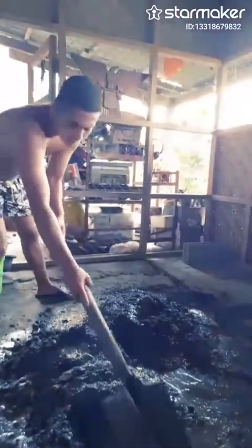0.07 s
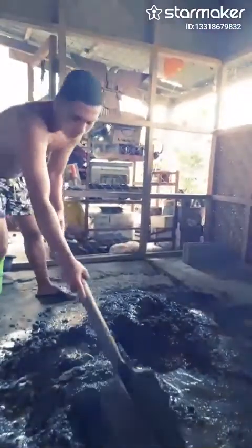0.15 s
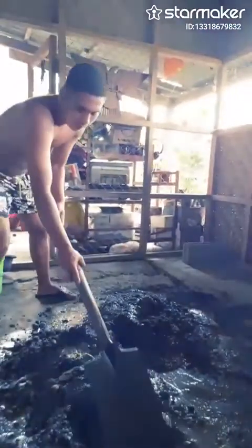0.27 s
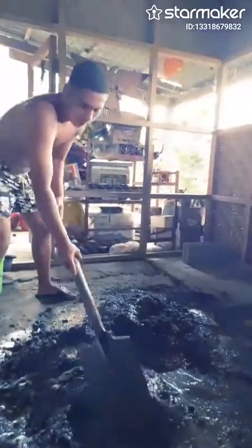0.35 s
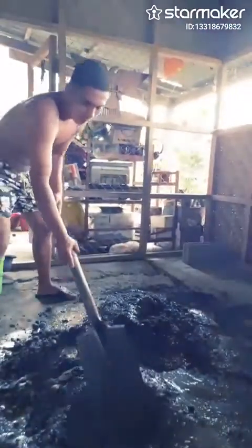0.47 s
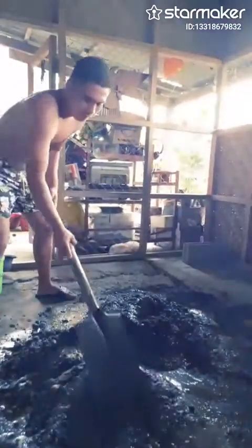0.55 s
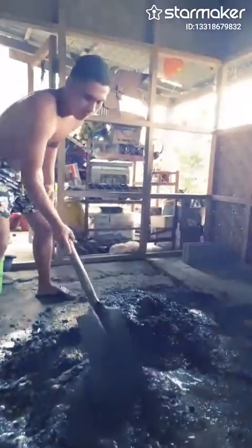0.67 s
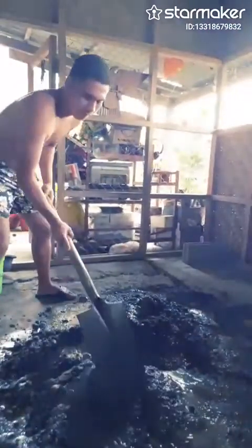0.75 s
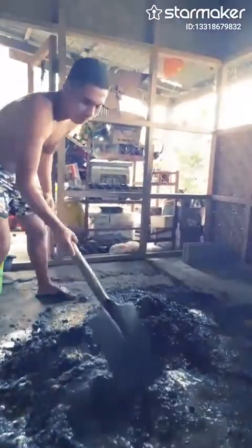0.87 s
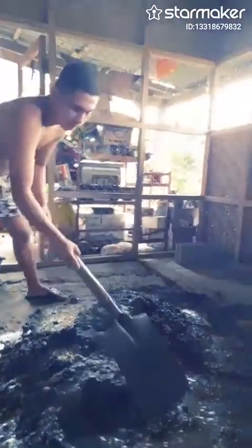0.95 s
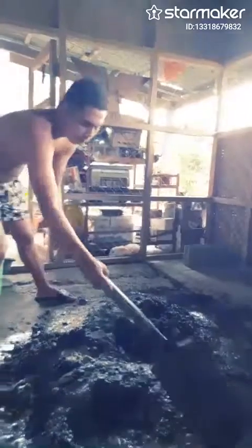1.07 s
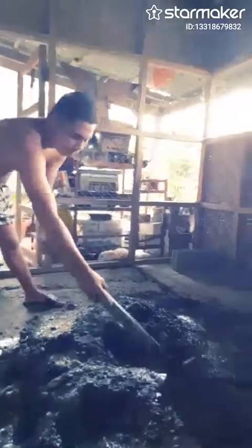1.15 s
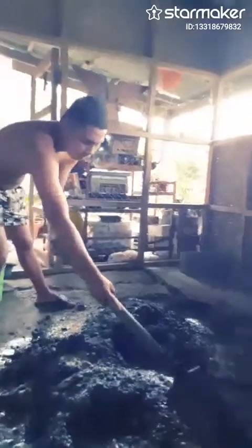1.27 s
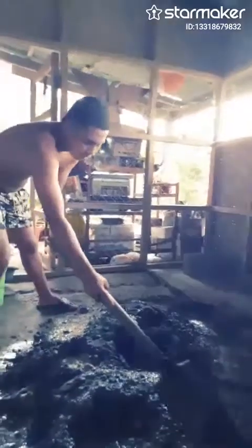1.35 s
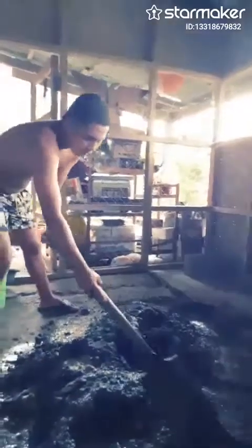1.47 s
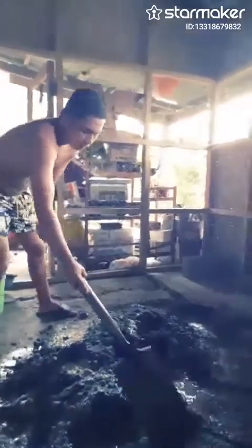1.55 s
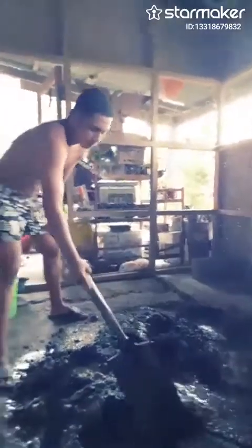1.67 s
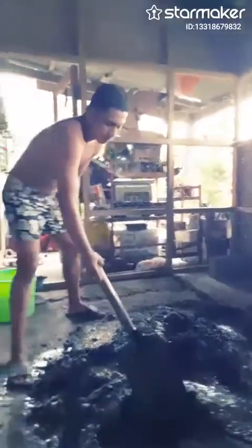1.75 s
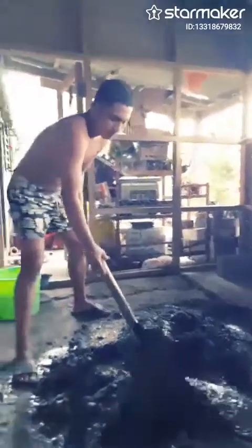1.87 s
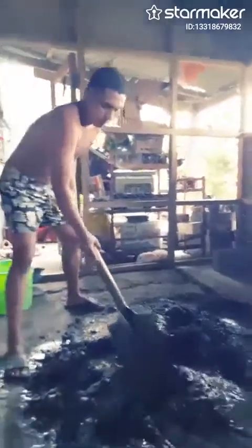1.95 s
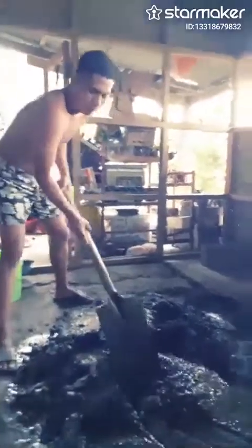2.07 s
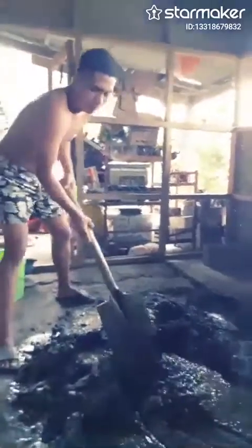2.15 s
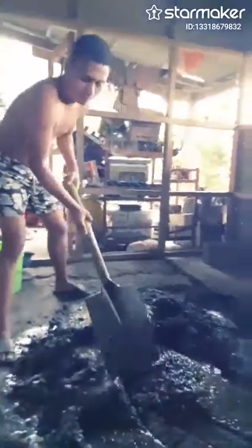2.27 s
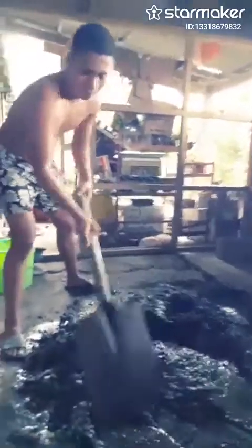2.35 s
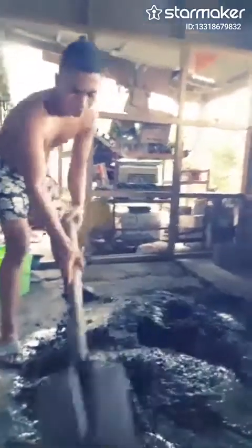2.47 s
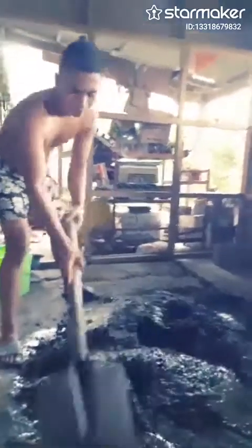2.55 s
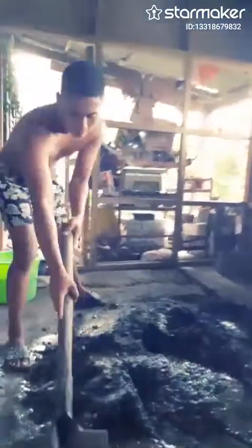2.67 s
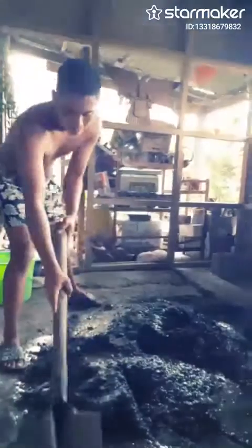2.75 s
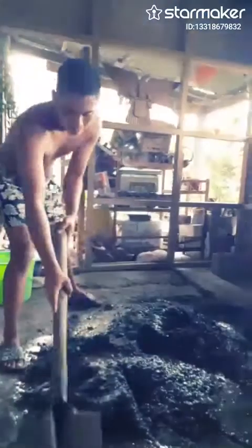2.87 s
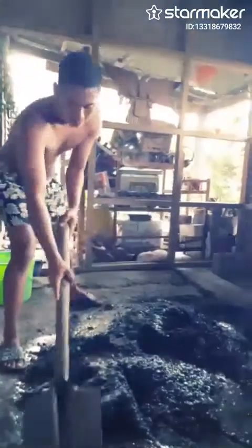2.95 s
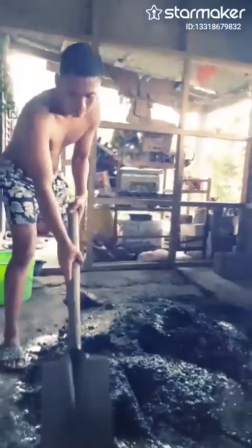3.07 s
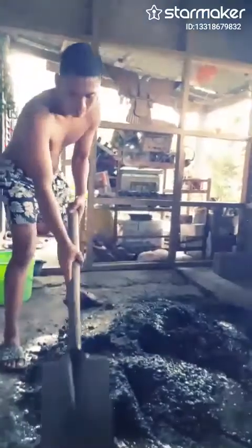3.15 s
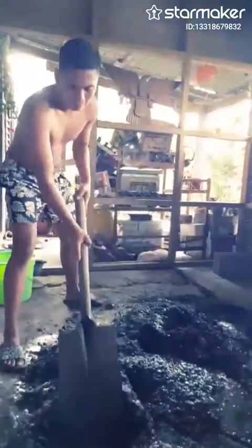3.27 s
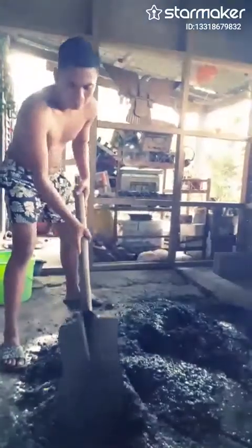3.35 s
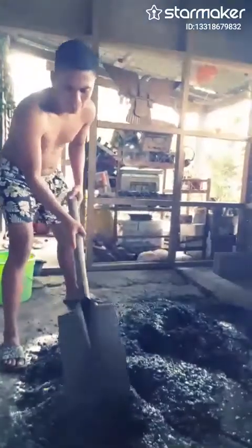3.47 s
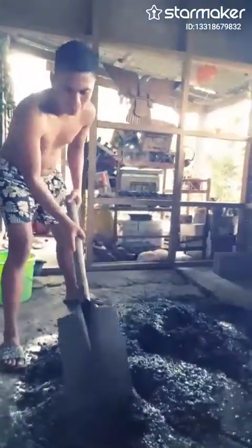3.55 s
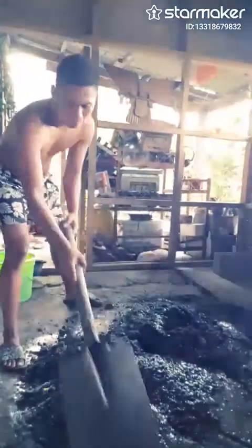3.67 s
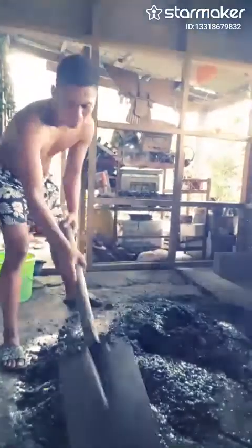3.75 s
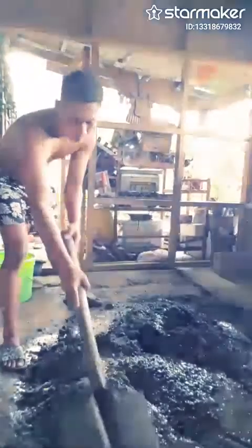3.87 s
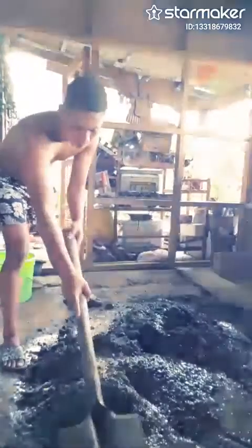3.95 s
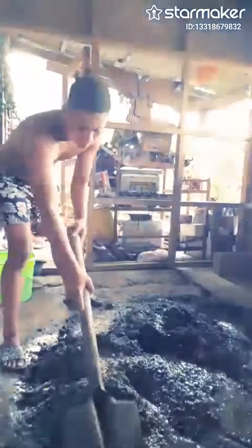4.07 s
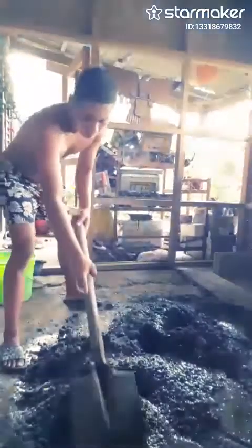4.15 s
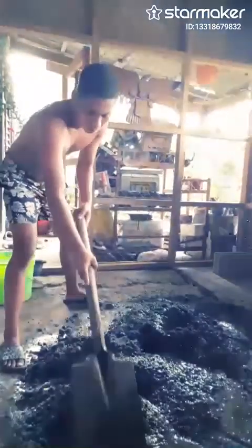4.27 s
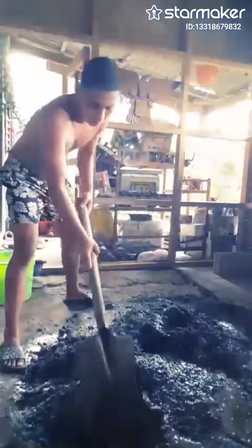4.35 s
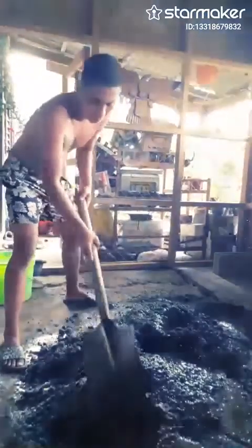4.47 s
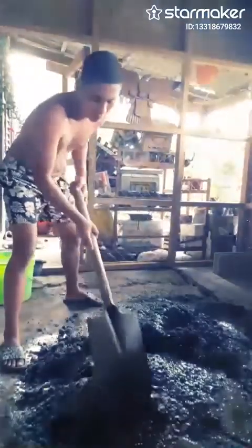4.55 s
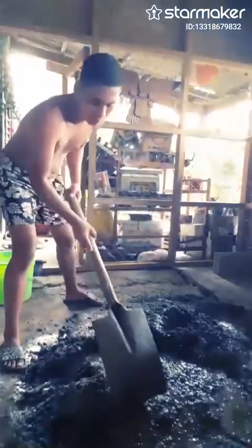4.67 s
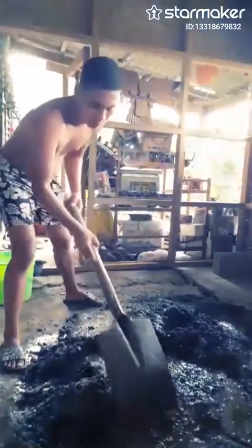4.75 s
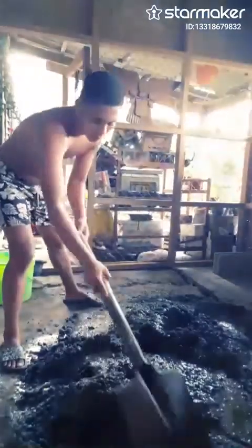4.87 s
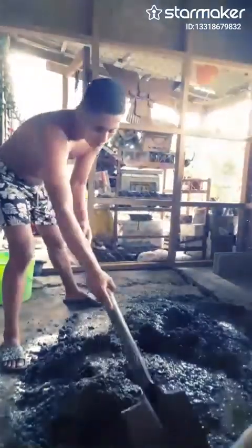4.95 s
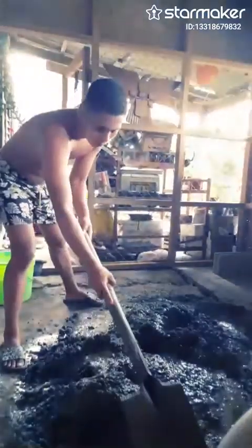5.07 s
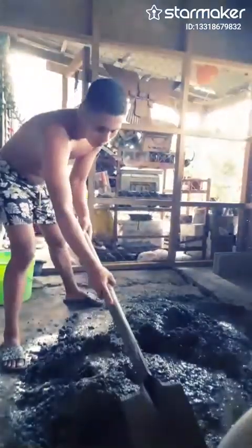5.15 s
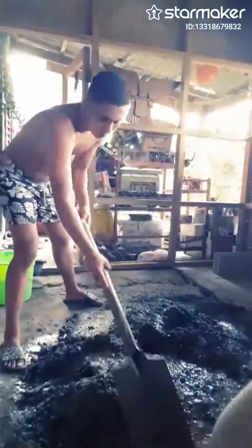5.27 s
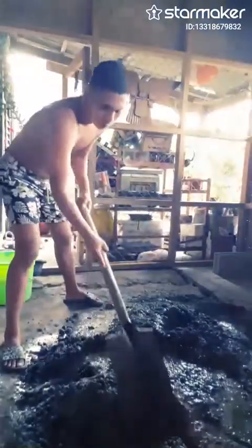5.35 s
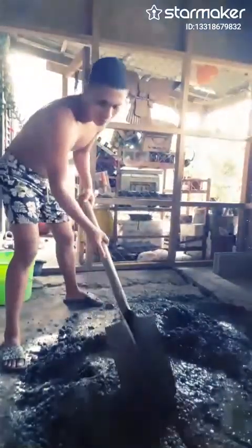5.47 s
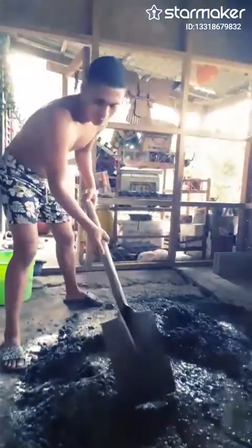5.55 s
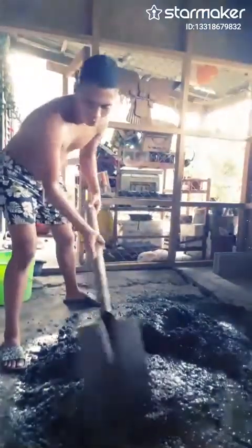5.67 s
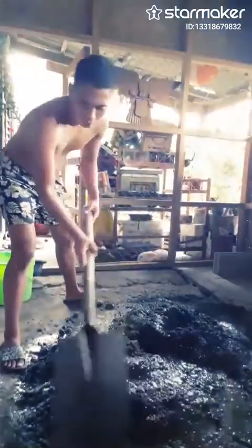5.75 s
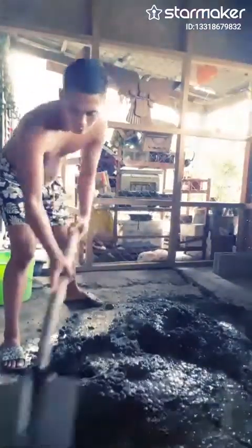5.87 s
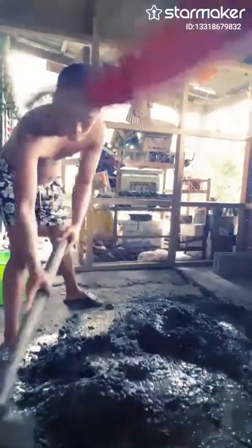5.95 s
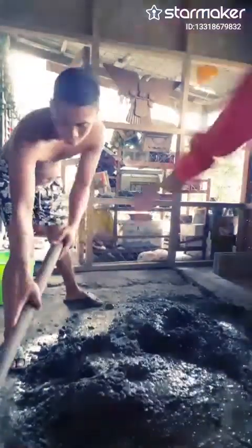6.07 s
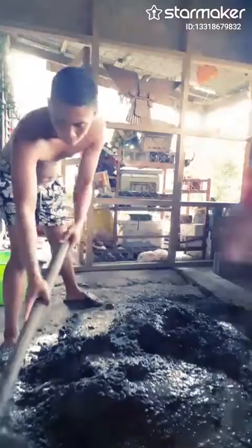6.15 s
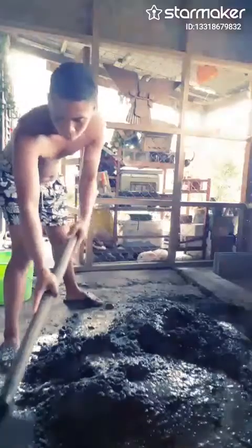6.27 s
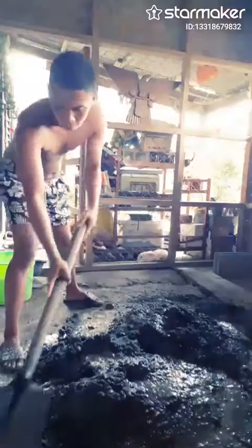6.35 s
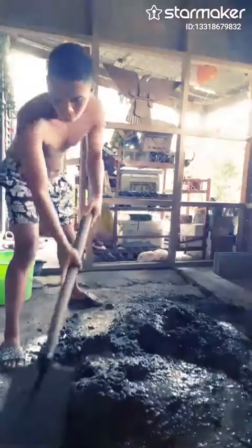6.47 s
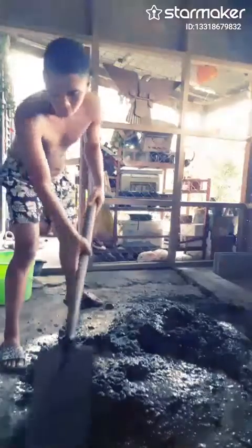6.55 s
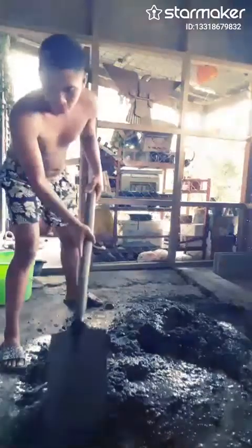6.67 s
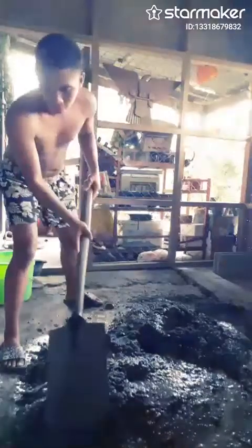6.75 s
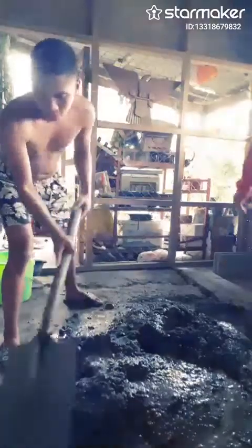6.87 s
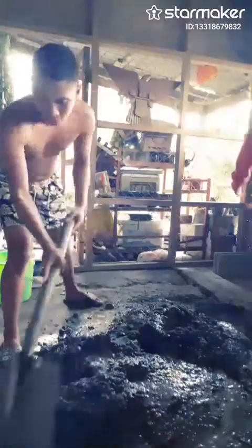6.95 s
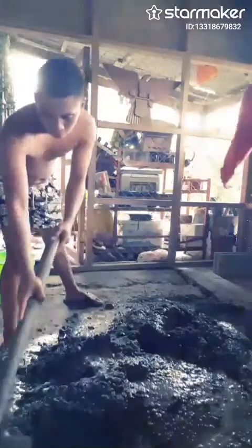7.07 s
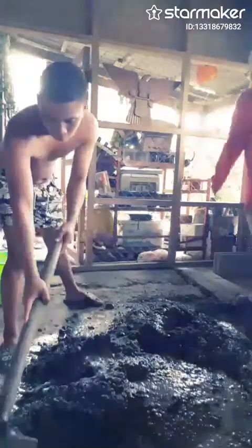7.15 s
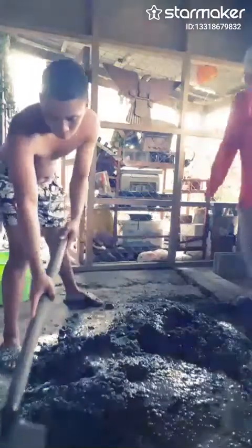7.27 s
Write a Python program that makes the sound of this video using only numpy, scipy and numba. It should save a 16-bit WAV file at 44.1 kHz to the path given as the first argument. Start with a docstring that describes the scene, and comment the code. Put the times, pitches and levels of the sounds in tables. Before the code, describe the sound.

A steel shovel scrapes and crunches through wet gritty mortar on a concrete floor, bright and hissy, over a faint low motor drone.

```python
"""In an open shed, a steel shovel turns wet mortar on the concrete floor.
Stick-slip friction of the edge over sand excites hiss, rasp and rumble; the steel blade resonates with them.
Blows ring the low modes of floor and heap, and knocks on bare steel ring the higher modes of the blade.
Behind, sine partials give a motor drone with mains hum, over soft outdoor noise; thin far chirps glide in pitch.
Decaying noise tails stand for the reflections of the shed, and a limiter holds the peaks."""
import sys
import numpy as np
from scipy import signal
from scipy.fft import rfft, irfft
from scipy.io import wavfile
from scipy.ndimage import uniform_filter1d, minimum_filter1d
from numba import njit

SR = 44100
rng = np.random.default_rng(int(sys.argv[2]) if len(sys.argv) > 2 else 0)


def materialize(psi):
    """Save the field psi as 16-bit PCM at rate SR to the path in sys.argv[1].

    A 1-D psi becomes a single channel; in a 2-D psi each row is a channel.
    """
    bounded = np.clip(np.atleast_2d(psi).T, -1, 1)
    quanta = np.round(bounded * 32767).astype(np.int16)
    wavfile.write(sys.argv[1], SR, quanta)


N = 321930
TIME = np.arange(N) / SR  # s

# common level of motor drone and mains hum over time: (time [s], level [dB])
DRONE_LEVEL = [(.7, -44.5), (1.05, -47), (1.6, -47), (2.4, -43), (7.3, -45)]
# partials of the motor drone, with mains hum at 120 Hz: (frequency [Hz], level relative to the drone [dB])
DRONE_PARTIALS = [(52.3, -25), (78.2, -.5), (103.5, -9.5), (120, -7.5)]
# spectrum of the outdoor noise: (frequency [Hz], relative spectral density [dB])
OUTDOOR_SPECTRUM = [(20, -13), (45, 5), (65, 6), (105, 3), (150, -3.5), (220, -9.5), (450, -23.5),
                    (900, -20), (1500, -24.5), (2500, -20.5), (5000, -18.5), (7500, -14.5), (9600, -4),
                    (12000, -21.5), (15800, -27)]
# far chirps: (start [s], length [s], first frequency [Hz], last frequency [Hz], level [dB])
CHIRPS = [(0.538, .3, 2250, 2035, -49), (0.555, 0.285, 2700, 2639, -55), (3.758, 0.067, 680, 885, -57),
          (3.82, 0.061, 960, 907, -50.5), (5.56, 0.193, 4520, 4640, -51), (5.678, 0.13, 5420, 5050, -48)]
# blade or lump of mortar thuds on the floor:
# (time [s], direct peak level [dB], pitch [Hz], 60 dB decay of the crumbling force [s])
THUDS = [(1.18, -36.5, 340, 0.04), (2.276, -37, 219, .05), (2.543, -36, 135, 0.048),
         (2.625, -19.5, 175, .11), (2.698, -35, 164, 0.11), (3.041, -36.5, 200, 0.52),
         (3.425, -42, 370, 0.23), (3.876, -28, 158, 0.14), (4.206, -30.5, 161, .064),
         (4.952, -35, 167, .087), (5.63, -40.5, 282, 0.2), (6.026, -31, 170, 0.068),
         (6.049, -22.5, 180, 0.17), (6.11, -34, 180, 0.13), (7.063, -25, 170, .12), (7.255, -19, 260, 0.1)]
# modes of floor and heap: (frequency [Hz], relative level [dB], 60 dB decay [s])
FLOOR_MODES = [(135.3, 2, 0.23), (161.3, -0.5, 0.088), (191.5, -10, 0.17), (258, -21, 0.23),
               (350.4, -14, 0.23)]
# knocks on the empty blade: (time [s], level [dB])
KNOCKS = [(2.1213, -37.5), (3.605, -61)]
# modes of the empty blade: (frequency [Hz], relative level [dB], 60 dB decay [s])
EMPTY_BLADE_MODES = [(1505, -16, 0.4), (1780, -25, 0.41), (2200, -1, 0.085), (3380, -2, 0.21),
                     (3704, 0, 0.084), (4200, -7, .25), (5300, -6, .16), (7100, -14, .2)]
# the blade is driven into the heap, and the pitch of the hollow under it changes as it fills:
# (start [s], end [s], sand hiss [dB], blade rasp [dB], load rumble [dB], swell over the push [dB],
#  rasp pitch [Hz], first hollow pitch [Hz], last hollow pitch [Hz])
PUSHES = [(0, 0.073, -10, -25, -38.5, -1.5, 4500, 990, 900), (.07, .287, -8, -28, -39, 1.5, 3960, 860, 960),
          (1.183, 1.295, -15.5, -33, -44, -1.5, 3930, 1500, 870),
          (1.325, 1.425, -13.5, -31, -38, 5.5, 3330, 800, 930),
          (2.631, 2.772, -12, -26.5, -38.5, 1, 3500, 1220, 855),
          (3.881, 4.206, -10.5, -29, -41.5, -5, 3430, 1260, 960),
          (4.958, 5.125, -10, -26.5, -37, 1.5, 2920, 1630, 1040),
          (5.16, 5.235, -10, -25, -34, -10, 3300, 960, 836),
          (6.068, 6.178, -10.5, -27.5, -42.5, 3, 3330, 1030, 720),
          (6.195, 6.29, -15.5, -32, -45, -1, 4140, 706, 730),
          (6.345, 6.485, -14.5, -31.5, -45, -3, 4140, 740, 790),
          (7.066, 7.101, -18, -34, -40.5, 2, 2900, 850, 855),
          (7.14, 7.3, -7, -23.5, -37.5, 16.5, 3950, 1120, 890)]
# the blade is drawn back lightly, or the wet load slides off it:
# (start [s], end [s], sand hiss [dB], blade rasp [dB], load rumble [dB], swell over the drag [dB],
#  rasp pitch [Hz], first hollow pitch [Hz], last hollow pitch [Hz])
DRAGS = [(.36, .648, -28, -46, -60, 1, 4300, 1200, 950), (.7, .98, -53.5, -57.5, -64, -9, 2780, 910, 840),
         (1.47, 1.51, -20, -37.5, -44.5, -0.5, 3300, 1050, 1110),
         (1.55, 1.63, -21.5, -40, -51.5, 3, 3100, 1110, 1160),
         (1.69, 1.86, -36, -48, -56, -2.5, 3750, 1250, 1290),
         (1.9, 2.045, -35.5, -51, -60, 1.5, 4600, 1140, 900),
         (2.545, 2.58, -42, -60, -75, 7, 3770, 900, 1000),
         (2.83, 3.1, -24.5, -39, -52, 0, 3600, 1200, 1300),
         (3.135, 3.342, -24.5, -41, -54.5, -1, 4470, 1300, 1400),
         (3.45, 3.51, -47, -55.5, -68, -6, 3450, 1300, 1110),
         (3.605, 3.622, -30.5, -43, -60, -2, 4620, 900, 850),
         (3.78, 3.82, -38.5, -48, -64, -1.5, 4200, 845, 950),
         (4.26, 4.47, -23.5, -41, -56, 2, 3560, 1030, 1450),
         (4.535, 4.715, -26.5, -40.5, -74, 5, 5100, 1500, 1400),
         (4.74, 4.84, -24.5, -35, -48, 2.5, 4350, 1450, 1200),
         (4.88, 4.95, -28, -41, -51.5, 2, 4540, 1160, 1130),
         (5.29, 5.405, -29.5, -46.5, -68, -7, 3900, 905, 1050),
         (5.46, 5.73, -44, -57, -68, -8, 4700, 810, 696),
         (6.005, 6.065, -23.5, -41.5, -51, 23.5, 3450, 1000, 1100),
         (6.55, 6.655, -31.5, -44.5, -55.5, 1, 3600, 1310, 1150)]
# the edge lands or catches on a stone: (time [s], hiss level [dB], rasp level [dB], 60 dB decay [s])
CATCHES = [(0.904, -40, -43, 0.032), (1.184, -12.5, -38, 0.071), (1.267, -9, -43, .06),
           (1.3745, -7, -28, 0.13), (1.913, -22.5, -36.5, .04), (2.1192, -15.5, -35.5, 0.12),
           (2.2383, -36, -47, .045), (2.28, -44, -46, 0.049), (2.5768, -22, -41.5, 0.042),
           (2.6278, -18, -22, 0.041), (2.6402, -4.5, -25, 0.035), (2.943, -17, -36, .035),
           (3.143, -19, -43, 0.13), (3.203, -15.5, -42, 0.024), (3.581, -34, -37.5, 0.026),
           (3.8813, -27, -30, 0.24), (3.9325, -20, -18, 0.015), (3.9594, -11, -36, 0.03),
           (4.135, -6.5, -42, 0.07), (4.1704, -4, -32, 0.088), (4.631, -16, -48, 0.025),
           (4.729, -13, -46, 0.047), (4.959, -24, -22, 0.13), (5.04, -12, -21, 0.15),
           (5.1565, -8, -37, 0.088), (5.2344, -3.5, -33, 0.063), (5.8963, -32, -58, 0.019),
           (5.9437, -30, -52, 0.029), (6.0269, -5.5, -36, 0.022), (6.071, -5, -23, 0.2),
           (6.2566, -8, -32, .05), (6.366, -7, -27, .04), (6.4697, -3.5, -26, 0.12),
           (7.067, -7, -44, 0.016), (7.131, -12, -30, 0.041)]
# spectrum of the sand hiss: (frequency [Hz], relative spectral density [dB])
SAND_SPECTRUM = [(4500, -43), (6000, -21), (7200, -16), (8200, -9.5), (9000, -3), (9650, 2), (10300, -4),
                 (11200, -10.5), (12500, -17), (14000, -20), (15800, -27.5)]
# spectrum of the blade rasp before its hollow: (frequency [Hz], relative spectral density [dB])
RASP_SPECTRUM = [(800, -27.5), (1400, -1.5), (2200, -2), (3000, -4.5), (4200, -5), (5500, 1.5), (7000, -5),
                 (10000, -43)]
# spectrum of the load rumble before its hollow: (frequency [Hz], relative spectral density [dB])
LOAD_SPECTRUM = [(90, -35.5), (170, 7), (280, 2.5), (380, 4.5), (470, -6.5), (650, 0.5), (1000, -7.5),
                 (1350, 2), (2200, -30.5)]
# resonances of the loaded blade: (mean frequency [Hz], bandwidth [Hz], relative level [dB])
LOADED_BLADE_MODES = [(588, 9.4, -11), (695.5, 21, -6.5), (740, 17, -30), (920, 30, -8.5), (1016, 42, -3.5),
                      (1136, 58, -6), (1385, 8.4, -9), (1519, 19, -12.5), (1807, 34, -7), (2063, 39, -8.5),
                      (2196, 25, -13.5), (2575, 134, -14), (2840, 113, -12), (3200, 47, -9.5),
                      (3340, 33, -13), (3540, 22, -8), (4106, 71, -6.5), (4300, 13, -26), (5500, 49, -13)]

PUSH_ATTACK_S, PUSH_RELEASE_DB_PER_S = 0.0049, 233
DRAG_ATTACK_S, DRAG_RELEASE_DB_PER_S = 0.038, 266
SHED_T60_S, SWING_PERIOD_S = 0.17, 1.688
LIMITER_CEILING, LIMITER_RELEASE_DB_PER_S = 0.95, 60.5
CUTOFF_HZ = 15650


def from_db(db):
    """Amplitude ratio: a level of 20 dB is a factor of ten."""
    return 10 ** (np.asarray(db) / 20)


def rms_one(x):
    """Normalisation to unit mean power."""
    return x / np.sqrt(np.mean(x ** 2) + 1e-20)


def drift(rate_hz):
    """Random wander of spread 1: noise through a double-pole low-pass, run at a tenth of the sample rate."""
    r = np.exp(-20 * np.pi * rate_hz / SR)
    noise = rng.standard_normal(N // 10 + 8002)
    slow = signal.lfilter([1], [1, -2 * r, r * r], noise)[8000:]  # the filter has settled
    return np.interp(np.arange(N) / 10, np.arange(len(slow)), rms_one(slow))


def colour(x, spectrum):
    """Minimum-phase filtering: the folded cepstrum gives a causal response of unit energy."""
    size = 4096
    hz, db = np.transpose(spectrum)
    grid = np.maximum(np.arange(size // 2 + 1) * SR / size, 1)
    magnitude = from_db(np.interp(np.log(grid), np.log(hz), db))
    cepstrum = irfft(np.log(magnitude))
    cepstrum[1:size // 2] *= 2
    cepstrum[size // 2 + 1:] = 0
    response = irfft(np.exp(rfft(cepstrum)))
    return signal.fftconvolve(x, response / np.linalg.norm(response))[:N]


def resonate(x, hz, width_hz):
    """Damped resonance: a pole pair whose radius sets the bandwidth, with gain 1 on top."""
    r = np.exp(-np.pi * width_hz / SR)
    zeros = np.array([1, 0, -1]) * (1 - r * r) / 2
    poles = [1, -2 * r * np.cos(2 * np.pi * hz / SR), r * r]
    return signal.lfilter(zeros, poles, x + 1e-18)


def surroundings(air_db, waver):
    """Line spectrum over broadband noise: drone and hum partials waver at one rate above outdoor noise."""
    drone_db = np.interp(TIME, *np.transpose(DRONE_LEVEL))
    warped_time = np.cumsum(1 + waver * drift(0.9)) / SR
    drone = np.zeros(N)
    for hz, db in DRONE_PARTIALS:
        amplitude = from_db(drone_db + db + 0.89 * drift(2.1)) * np.sqrt(2)
        drone += amplitude * np.sin(2 * np.pi * hz * warped_time)
    air = colour(rng.standard_normal(N), OUTDOOR_SPECTRUM)
    return drone + from_db(air_db) * air


def chirps(waver):
    """Frequency modulation: thin glides waver in pitch and flutter in level."""
    out, wobble = np.zeros(N), 1 + waver * drift(103)
    for start, length, first_hz, last_hz, db in CHIRPS:
        part = np.clip((TIME - start) / length, 0, 1)
        hz = (first_hz + (last_hz - first_hz) * part) * wobble
        phase = 2 * np.pi * np.cumsum(hz) / SR
        out += from_db(db) * np.sin(np.pi * part) * np.sin(phase)
    return out * rms_one(from_db(3.9 * drift(40)))


def shed(x, wet_db):
    """Exponential reverberant decay: the sound moves in turn through four patterns of reflections."""
    t, reflections = TIME[:SR // 2], np.zeros(N)
    swing = 2 * np.pi * TIME / SWING_PERIOD_S
    for k in range(4):
        # the first reflections arrive after 4 ms
        tail = rng.standard_normal(len(t)) * from_db(-60 * t / SHED_T60_S) * (t > .004)
        share = np.maximum(np.cos(swing + k * np.pi / 2), 0)
        reflections += signal.fftconvolve(x * share, tail / np.linalg.norm(tail))[:N]
    return x + from_db(wet_db) * reflections


def thuds():
    """Modal excitation: crumbling blows ring floor and heap, most of all the modes near their pitch."""
    out = np.zeros(N)
    t = TIME[:SR // 2]
    for s, peak_db, pitch_hz, crumble_s in THUDS:
        force = rng.standard_normal(len(t)) * from_db(-60 * t / crumble_s)
        thud = np.zeros(len(t))
        for hz, db, t60 in FLOOR_MODES:
            share = from_db(db - 24 * abs(np.log2(hz / pitch_hz)))  # 24 dB per octave of distance
            width_hz = np.log(1000) / (np.pi * t60)
            thud += share * resonate(force, hz, width_hz)
        thud *= from_db(peak_db) / np.abs(thud).max()
        start = int(s * SR)
        out[start:start + len(t)] += thud[:N - start]
    return out


def clinks():
    """Impulse response: a knock on bare steel sets all its modes into free decay."""
    t, knocks = TIME[:SR // 2], np.zeros(N)
    for s, db in KNOCKS:
        knocks[int(s * SR)] = from_db(db)
    ring = np.zeros(len(t))
    for hz, db, t60 in EMPTY_BLADE_MODES:
        ring += from_db(db - 60 * t / t60) * np.sin(2 * np.pi * hz * t)
    return signal.fftconvolve(knocks, ring)[:N]


def strokes():
    """Power addition: overlapping movements set hiss, rasp and load [dB], rasp and hollow pitch [Hz]."""
    power, pitch, weight = np.full((3, N), 1e-12), np.zeros((2, N)), np.zeros(N)
    kinds = ((PUSHES, PUSH_ATTACK_S, PUSH_RELEASE_DB_PER_S),
             (DRAGS, DRAG_ATTACK_S, DRAG_RELEASE_DB_PER_S))
    for rows, attack_s, release in kinds:
        for start, end, hiss_db, rasp_db, load_db, swell_db, rasp_hz, first_hz, last_hz in rows:
            near = (TIME > start - attack_s) & (TIME < end + .5)
            t, length = TIME[near] - start, abs(end - start)
            part = np.clip(t / length, 0, 1)
            onset = np.minimum(1 + t / attack_s, 1)
            effort = onset * from_db(swell_db * (part - .5) - release * np.maximum(t - length, 0))
            layers = (from_db([[hiss_db], [rasp_db], [load_db]]) * effort) ** 2
            power[:, near] += layers
            # where movements overlap, the pitch is their mean weighted by rasp power
            weight[near] += layers[1]
            pitch[0, near] += layers[1] * rasp_hz
            pitch[1, near] += layers[1] * first_hz * (last_hz / first_hz) ** part
    return 10 * np.log10(power), np.maximum(pitch / (weight + 1e-30), 1)


def catches():
    """Stick and release: envelopes of the hiss and rasp of each crunch, and of the hush before it."""
    hiss, rasp, stuck = np.zeros(N), np.zeros(N), np.zeros(N)
    for s, hiss_db, rasp_db, t60 in CATCHES:
        after = (TIME >= s) & (TIME < s + 2 * t60)
        fade = from_db(-60 * (TIME[after] - s) / t60)
        hiss[after] += from_db(hiss_db) * fade
        rasp[after] += from_db(rasp_db) * fade
        stuck += np.interp(TIME - s, [-.022, -.012, 0, .001], [0, 1, 1, 0])
    return hiss, rasp, stuck


def grains(per_s, spread_db, bed):
    """Shot noise: sand grains crack at random, a few much harder, over a bed of fine friction."""
    sizes = from_db(spread_db * np.minimum(rng.exponential(1, N), 3.5))
    signs = rng.choice([-1, 1], N)
    struck = rng.random(N) < per_s / SR
    return rms_one(rms_one(sizes * signs * struck) + bed * rng.standard_normal(N))


def hollow(x, pitch_hz, focus_db, wander_octaves):
    """Cavity resonance: third-octave gains follow an unsteady gliding pitch while the power stays near 1."""
    centre = np.log2(pitch_hz) + wander_octaves * drift(11.6)
    out, power = np.zeros(N), np.zeros(N)
    for k, hz in enumerate(160 * 2 ** (np.arange(18) / 3)):
        edges = hz * 2 ** (np.array([-1, 1]) / 6)
        band = signal.sosfilt(signal.butter(2, edges, "band", fs=SR, output="sos"), x)
        gain = from_db(-focus_db * np.minimum(np.abs(np.log2(hz) - centre), 1))
        out += (-1) ** k * band * gain  # neighbouring bands take opposite signs
        power += np.var(band) * gain ** 2
    return rms_one(out / np.sqrt(power))


@njit
def moving_mode(x, hz, width_hz):
    """Time-varying resonance: a damped rotating phasor turns at a new pitch on every sample."""
    r, state, out = np.exp(-np.pi * width_hz / SR), 0j, np.zeros(len(x))
    for i in range(len(x)):
        state = state * r * np.exp(2j * np.pi * hz[i] / SR) + x[i]
        out[i] = 2 * (1 - r) * state.real
    return out


def blade(x, ring_db, shift_db, detune):
    """Plate resonance: shifting load and contact keep changing the pitch and mix of the steel's modes."""
    rings = np.zeros(N)
    for hz, width_hz, db in LOADED_BLADE_MODES:
        share = from_db(db + shift_db * np.tanh(drift(16.0)))
        rings += moving_mode(x * share, hz * (1 + detune * drift(2.7)), width_hz)
    return x + from_db(ring_db) * rings


def scrape(slip_db, chatter_db, lurch_db, stuck_db, rasp_share):
    """Stick-slip friction: the slips of the edge over sand drive hiss, rasp and rumble together."""
    (hiss_db, rasp_db, load_db), (rasp_hz, hollow_hz) = strokes()
    hiss_catch, rasp_catch, stuck = catches()

    # a hard push judders; sliding mortar is smoother
    pressure = np.interp(hiss_db, [-28, -14], [.6, 1])
    judder_db = lurch_db * drift(25) + slip_db * drift(85) + chatter_db * drift(200)
    slips_db = pressure * judder_db - stuck_db * stuck
    slips, soft_slips = rms_one(from_db(slips_db)), rms_one(from_db(rasp_share * slips_db))

    sand, grit = grains(7000, 2.7, bed=0.87), grains(1600, 2.4, bed=0.49)
    sliding_sand = sand * from_db(hiss_db) * slips
    crunch = hiss_catch * rng.standard_normal(N)
    hiss = colour(sliding_sand + crunch, SAND_SPECTRUM)

    rasp = colour(grit + 0.76 * sand, RASP_SPECTRUM)
    rasp = hollow(rasp, rasp_hz, focus_db=7.0, wander_octaves=0.21)
    rasp *= np.hypot(from_db(rasp_db) * soft_slips, rasp_catch)

    load = hollow(colour(grit, LOAD_SPECTRUM), hollow_hz, focus_db=11, wander_octaves=0.067)
    load *= from_db(load_db) * soft_slips
    return hiss + blade(rasp + load, ring_db=7.0, shift_db=9.5, detune=0.019)


def scene():
    """Superposition: the shovel in the shed, over the drone, the outdoor noise and the chirps."""
    background = surroundings(air_db=-42.5, waver=0.0057)
    far = shed(chirps(waver=0.0124), wet_db=-4)
    scraping = scrape(slip_db=2.0, chatter_db=0.52, lurch_db=0.26, stuck_db=3.5, rasp_share=0.55)
    shovel = thuds() + clinks() + scraping
    return (background + far + shed(shovel, wet_db=-9.5))[None]


def record(dry):
    """Peak limiting: loud peaks duck the whole sound, which recovers slowly; a steep low-pass follows."""
    over_db = 20 * np.log10(np.maximum(np.abs(dry) / LIMITER_CEILING, 1))
    recovery_db = LIMITER_RELEASE_DB_PER_S * TIME
    cut_db = np.maximum.accumulate(over_db + recovery_db, axis=-1) - recovery_db
    # the gain begins to fall just ahead of each peak
    gain = uniform_filter1d(minimum_filter1d(from_db(-cut_db), size=65), size=65)
    low_pass = signal.ellip(12, .1, 80, CUTOFF_HZ, fs=SR, output="sos")
    return signal.sosfilt(low_pass, dry * gain)


dry = scene()
out = record(dry)
materialize(out)
```